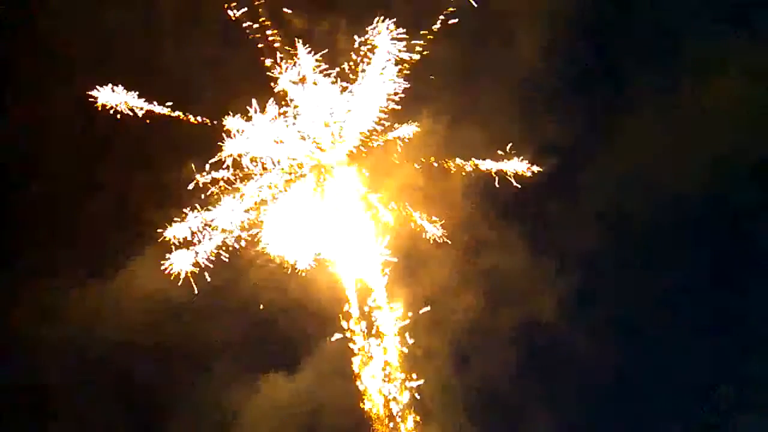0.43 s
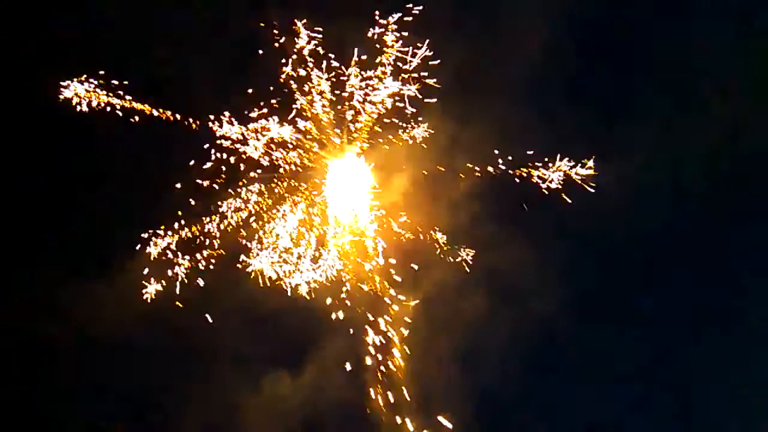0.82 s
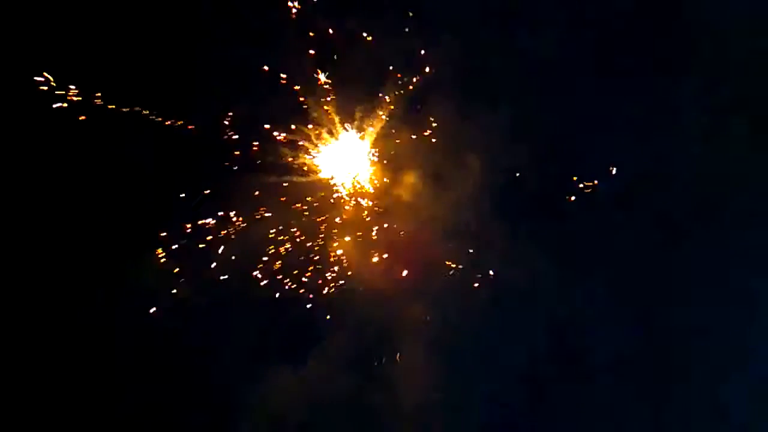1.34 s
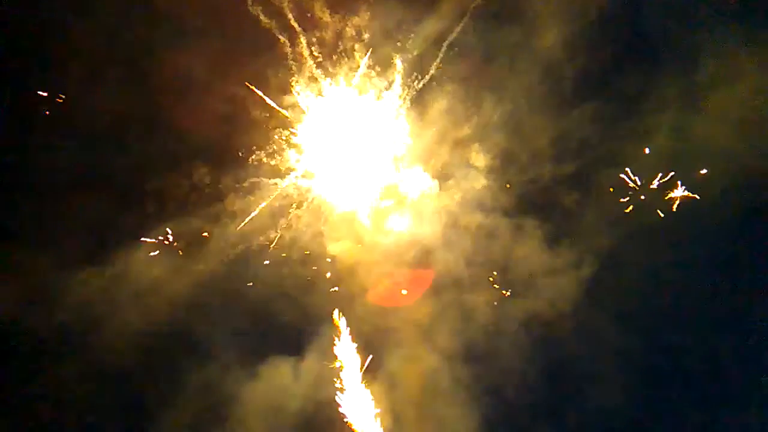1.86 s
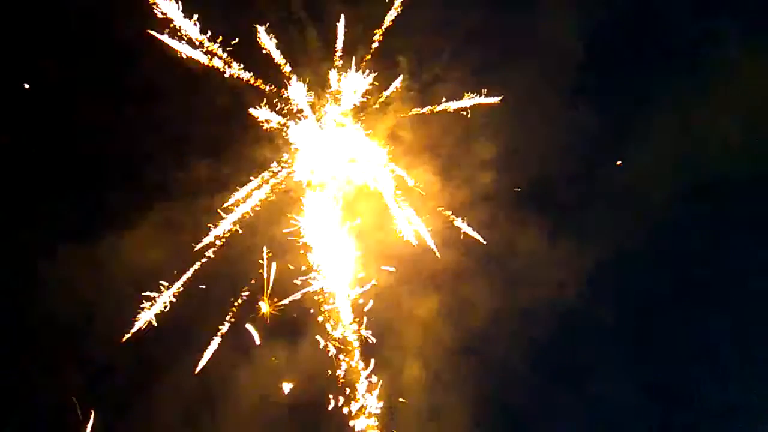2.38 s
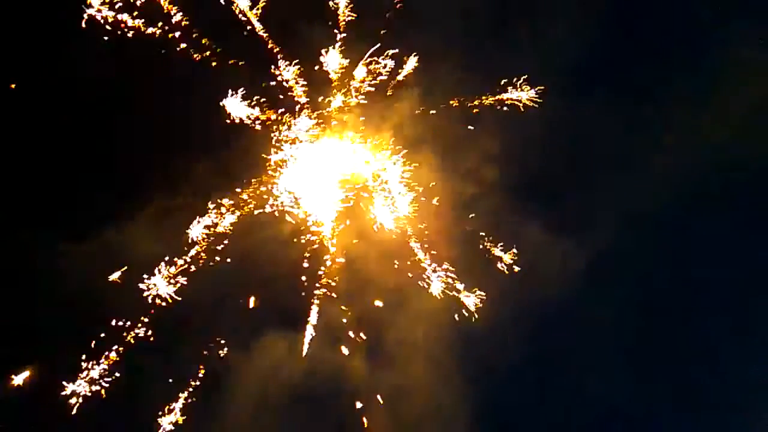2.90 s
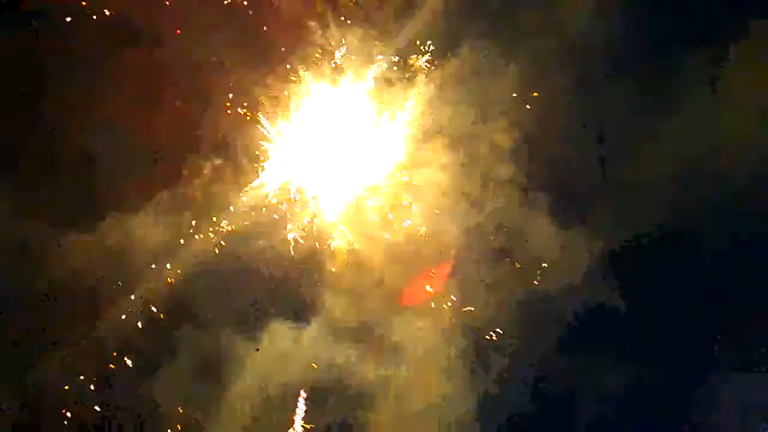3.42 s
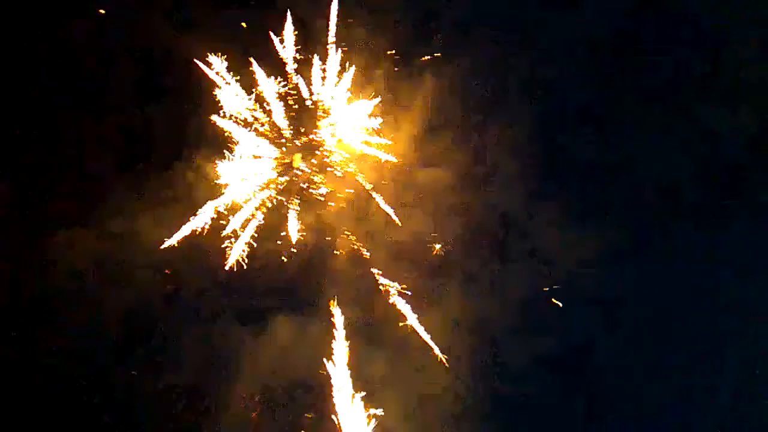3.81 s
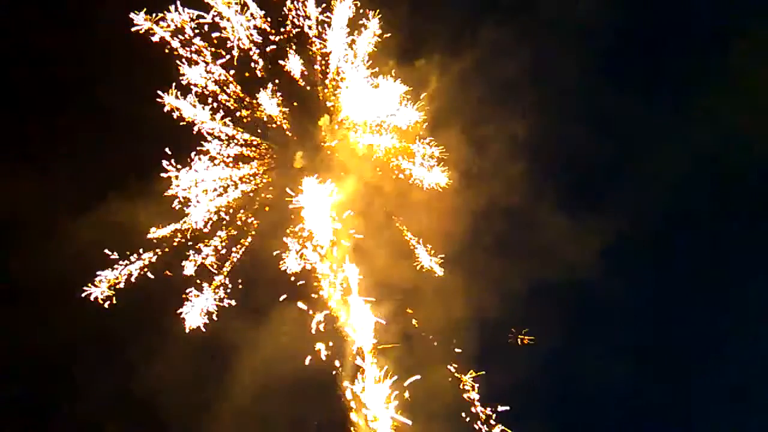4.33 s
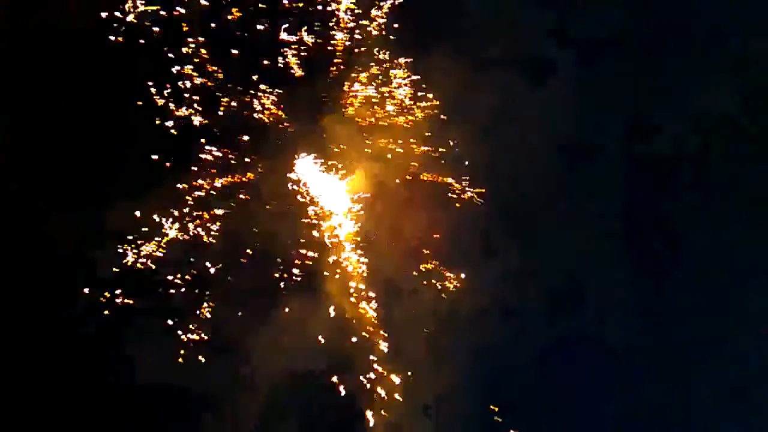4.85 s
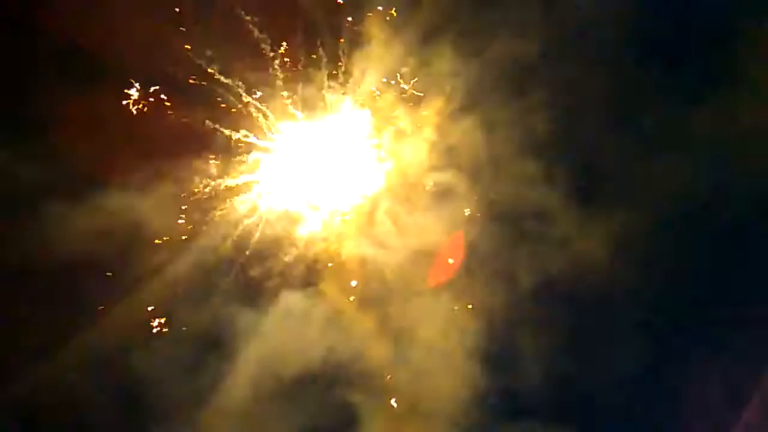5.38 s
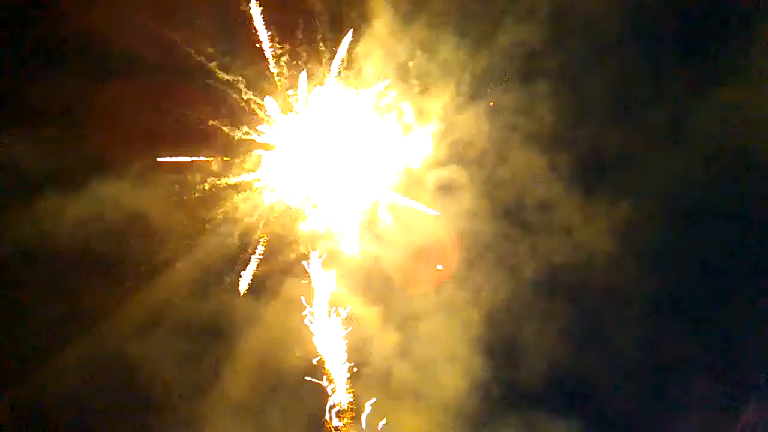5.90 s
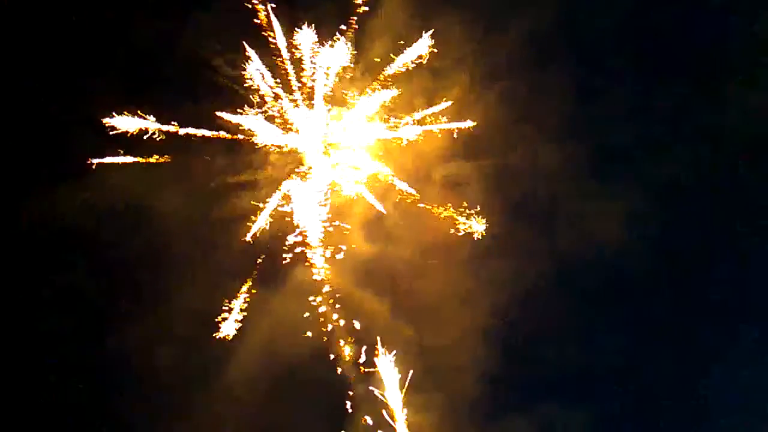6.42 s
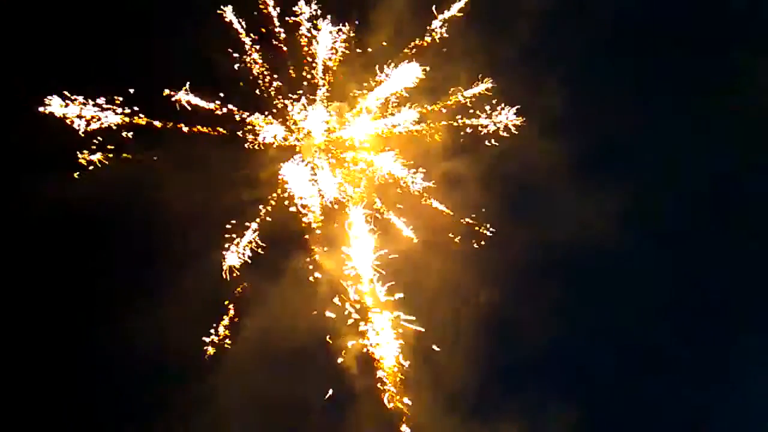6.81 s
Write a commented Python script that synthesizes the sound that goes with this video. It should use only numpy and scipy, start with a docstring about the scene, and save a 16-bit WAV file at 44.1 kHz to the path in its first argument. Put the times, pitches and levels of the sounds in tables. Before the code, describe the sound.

Outdoors at night, a firework battery fires close to a small, easily overloaded microphone. Two blunt, spitting launch bangs hit at about 0.0 and 0.2 s, with rough echoes and a low far rumble. Dense, bright crackling swells around 0.45 s, then thins into single snaps from 1.0 to 1.3 s and near quiet. A second volley starts with a launch at 1.7 s, then tight double-cracking bursts and another launch at 1.95 to 2.1 s; crackle peaks near 2.85 s and fades. At 3.5 to 3.75 s two bursts and a heavy launch slam, another thud follows at 4.1 s, and crackle thickens around 4.4 s, leaving sharp pops from 4.9 to 5.5 s. The last volley bangs at 5.65, 6.15 and 6.35 s, with crackle fullest near 6.8 s, still sputtering at the end. Each bang distorts and briefly ducks the sound; faint air hiss continues.

```python
"""A firework battery at night: tubes spit and push as they launch shells, and the shells burst with double
cracks. Trees, roofs and walls throw each bang back as shaped noise and low thumps, over a long far rumble.
Showers of crackling stars are random clicks sent through short paths; steady noise is the night air. Every bang
overloads a small microphone, which goes deaf for a moment. Above 4 kHz the treble flickers wide in random
patches."""
import sys
import numpy as np
from scipy import signal
from scipy.io import wavfile
from scipy.ndimage import uniform_filter1d

SR = 44100
rng = np.random.default_rng(int(sys.argv[2]) if len(sys.argv) > 2 else 0)


def field_ratio(decibels):
    """Amplitude ratio for a level in dB (20 dB per decade); scalars and array-likes work."""
    return 10 ** (np.asarray(decibels, dtype=float) / 20)


def put_to_file(sound):
    """Save the sound as 16-bit audio at rate SR, in the file named by the first command-line argument."""
    columns = np.atleast_2d(sound).T  # one column per channel
    safe = np.clip(columns, -1, 1)
    whole_steps = np.round(safe * 32767)
    wavfile.write(sys.argv[1], SR, whole_steps.astype(np.int16))


N = 319284  # samples


def evened(x):
    """Normalisation by mean power: scales a signal to rms 1."""
    return x / np.sqrt(np.mean(x ** 2) + 1e-20)


def add(mix, start_s, sound):
    """Linear superposition: mixes a sound in at its start time."""
    part = mix[round(start_s * SR):][:len(sound)]
    part += sound[:len(part)]


def colour(points, size=4096):
    """Minimum-phase filter of energy 1: the Hilbert transform of the log gain gives its causal phase."""
    point_hz, point_db = np.transpose(points)
    hz = abs(np.fft.fftfreq(size, 1 / SR))
    level_db = np.interp(np.log(hz + 1), np.log(point_hz + 1), point_db)
    log_gain = np.log(field_ratio(np.maximum(level_db, -100)))
    taps = np.fft.ifft(np.exp(np.conj(signal.hilbert(log_gain)))).real
    return taps / np.linalg.norm(taps)


def noise(points):
    """Spectral shaping: white noise through a filter of energy 1 keeps an rms of about 1."""
    return signal.oaconvolve(rng.standard_normal(N), colour(points))[:N]


def humps(t, rows):
    """Energy summation of Gaussian humps, 6 dB down one swell time before and one fall time after the top."""
    power = 0
    for top_s, level_db, swell_s, fall_s in rows:
        width_s = np.where(t < top_s, swell_s, fall_s)
        power = power + field_ratio(2 * level_db - 12 * ((t - top_s) / width_s) ** 2)
    return power


def night_air():
    """Stationary background: coloured Gaussian noise at a constant level."""
    # relative spectral density of the background: hz, level_db (per Hz)
    night_colour = [(18, -65), (30, 11), (557, -18), (1740, -10), (2370, -24), (3150, -1.5), (5020, -5.5),
                    (6020, 0.5), (14500, -26)]
    return field_ratio(-48) * noise(night_colour)


def star_clicks():
    """Inhomogeneous Poisson-like process: pops grow denser as the crackle grows louder."""
    # showers of crackling stars, one after each volley: thickest_s, level_db, swell_s, fall_s
    showers = [(0.449, -15.5, 0.36, .44), (2.85, -19, .36, .38), (4.4, -18, .34, 0.39),
               (6.802, -21, .47, 0.44)]
    stragglers_db = -48.5  # late stars between showers
    level_db = 10 * np.log10(humps(np.arange(N) / SR, showers) + field_ratio(2 * stragglers_db))
    per_s = 2800 * field_ratio(1.05 * (level_db + 20))
    clumps = field_ratio(2.2 * evened(uniform_filter1d(rng.standard_normal(N), 500)))
    sizes = field_ratio(3.15 * np.minimum(rng.exponential(1, N), 3.5))
    clicks = sizes * (rng.random(N) < per_s * clumps / SR)
    # divide by the expected rms so that density does not set the level
    return clicks * field_ratio(level_db) / np.sqrt(per_s / SR * np.mean(sizes ** 2) * np.mean(clumps))


def stars(count=24):
    """Impulse-response convolution: each place in the sky has its own snap, ground echo and tail."""
    # relative spectral density of the crackle: hz, level_db (per Hz)
    star_colour = [(200, -24), (500, -14), (900, -11.5), (1700, -6.5), (2400, -13.5), (3300, -3.5),
                   (4000, -7), (5400, -3), (6200, 0), (6700, -6.5), (7200, -16), (8500, -20.5),
                   (9300, -28.5), (12600, -36.5), (14500, -50)]
    # single pops that stand out: start_s, peak_db, ring_hz
    pops = [(1.016, -13, 4470), (1.057, -17, 4550), (1.073, -10, 4870), (1.152, -19, 6200),
            (1.174, -12.5, 3310), (1.193, -11, 5350), (1.224, -14.5, 5310), (1.257, -18, 6450),
            (1.517, -23, 5610), (1.6, -28, 6460), (1.642, -39, 6140), (1.669, -18.5, 4900),
            (1.916, -20.5, 5130), (3.504, -27, 5740), (4.869, -10.5, 6260), (5.014, -13, 5360),
            (5.03, -22, 5590), (5.062, -11.5, 5500), (5.094, -17, 5390), (5.129, -27, 5340),
            (5.253, -17.5, 3330), (5.415, -30, 6260), (5.452, -27, 6270), (5.459, -26, 6140),
            (5.472, -29, 6180), (5.491, -36, 5710), (5.511, -33, 6000), (5.523, -19.5, 6000),
            (5.591, -23, 5960), (5.966, -15, 2690), (6.081, -16, 3250)]
    clicks, place = star_clicks(), rng.integers(0, count, N)
    t = np.arange(round(.15 * SR)) / SR
    snaps = rng.standard_normal((count, len(t))) * field_ratio(-20000 * t)
    tails = rng.standard_normal((count, len(t))) * field_ratio(-24.0 - 1100 * t)
    ground_delays = np.round(rng.uniform(.005, .011, count) * SR).astype(int)
    crackle, edges = np.zeros((2, N))
    for k in range(count):
        path = snaps[k] + field_ratio(-4) * np.roll(snaps[k], ground_delays[k]) + tails[k]
        crackle += signal.oaconvolve(clicks * (place == k), path / np.linalg.norm(path))[:N]
    body = colour(star_colour)
    for k, (start_s, peak_db, ring_hz) in enumerate(pops):
        snap = .2 * np.cos(2 * np.pi * ring_hz * t) * field_ratio(-12000 * t)
        snap[0] = 1
        snap *= field_ratio(peak_db) / abs(np.convolve(snap[:200], body[:200])).max()  # peak after the filter
        ground_echo = field_ratio(-8) * np.roll(snap, round(.007 * SR))
        add(crackle, start_s, snap + ground_echo + 1.3 * snap[0] * tails[k % count])
        add(edges, start_s, field_ratio(peak_db - 9) * np.array([1, -1]))  # a sharp, bright edge
    return signal.oaconvolve(crackle, body)[:N] + edges


def thump(hz=260, decay_s=0.0017):
    """Damped oscillation: a wall returns the bang as a cycle or two of low pressure."""
    t = np.arange(round(.02 * SR)) / SR
    return np.sin(2 * np.pi * hz * t) * np.exp(-t / decay_s) * 2


def booms(count=8, per_s=170):
    """Shot noise of rms 1: a steady hail of low thumps of differing pitch, as from single reflectors."""
    hits = rng.standard_normal(N) * (rng.random(N) < per_s / SR)
    kind = rng.integers(0, count, N)
    hail = np.zeros(N)
    for k, hz in enumerate(np.geomspace(230, 620, count)):
        hail += signal.oaconvolve(hits * (kind == k), np.sqrt(hz) * thump(hz, 1.4 / hz))[:N]
    return evened(hail)


def echoes(start_s, fade, place, bus):
    """Scattering and reflection: adds a bang's echo power, its feed to the far rumble and its wall returns."""
    # groups of trees and roofs that scatter a bang, by its place: delay_s, level_db, swell_s, fall_s
    scatterers = {"near": [(.018, -5.5, 0.0072, 0.014), (.052, -11, .005, 0.022),
                  (.092, -14.5, 0.045, 0.043), (.16, -32, .03, .075)], "side": [(.033, 2.5, .009, 0.0079),
                  (.058, -14.5, 0.0033, .03), (.09, -8, 0.0093, 0.025), (.18, -23.5, 0.099, 0.12)],
                  "sky": [(.0011, -8.5, 0.00082, 0.0032), (.016, -6, 0.0051, .017),
                  (.042, -12, 0.013, 0.033), (.08, -14, .021, .025), (.12, -22, .04, 0.13)]}
    # single walls that return the thump, by the place of the bang: delay_s, level_db
    walls = {"near": [(.018, -23), (.0476, -4), (.0532, -10.5), (.12, -15)], "side": [(.026, -22),
             (.056, -13)], "sky": [(.03, -11.5), (.055, -7.5), (.068, -19), (.088, -13.5)]}
    # how strongly a bang feeds the far rumble, by its place: level_db
    roll_feed = {"near": -5.2, "side": -.1, "sky": 4.7}
    t = np.arange(round(.35 * SR)) / SR
    power = humps(t, scatterers[place]) * field_ratio(-2 * fade * t)  # fade in dB/s
    darkening = 22.4  # extra fade of the bright echo, dB/s
    add(bus["bright"], start_s, power * field_ratio(-2 * darkening * t))
    add(bus["low"], start_s, power)
    add(bus["far"], start_s + 0.017, field_ratio([2 * (roll_feed[place] - 0.4 * fade)]))
    for delay_s, level_db in walls[place]:
        add(bus["pressure"], start_s + delay_s, field_ratio(level_db) * thump())


def far_roll(feed):
    """Exponential reverberant decay: each bang's energy dies away as a far rumble."""
    # relative spectral density of the rumble: hz, level_db (per Hz)
    roll_colour = [(40, 1), (65, -3.5), (150, -3.5), (400, 0), (1200, -6), (3000, -11.5), (7000, -38),
                   (14000, -37)]
    level_db, t60_s = -29, 2.81
    step = field_ratio(-120 / t60_s / SR)  # power kept from one sample to the next
    return field_ratio(level_db) * np.sqrt(signal.lfilter([1], [1, -step], feed)) * noise(roll_colour)


def echo_field(bus):
    """Energy envelopes on noise: lumpy bright scatter, a low hail of thumps and the far roll."""
    # relative spectral density of the bright scatter: hz, level_db (per Hz)
    echo_colour = [(40, -28), (100, 1.5), (600, -5), (900, -6.5), (1800, -0.5), (2500, -3), (3400, -0.5),
                   (5200, -3), (6000, -10.5), (8400, -21.5), (12200, -35), (14500, -44)]
    lumps = field_ratio(1.86 * evened(uniform_filter1d(rng.standard_normal(N), 120)))  # separate reflectors
    bright = np.sqrt(bus["bright"]) * evened(lumps) * noise(echo_colour)
    low = field_ratio(-11.5) * np.sqrt(bus["low"]) * booms()
    return bright + low + far_roll(bus["far"])


def push(level_db, hold_s, rise_s=0.0015):
    """Blast wave: overpressure jumps up, holds and drains into a shallow suction."""
    t = np.arange(round(.06 * SR)) / SR
    u = t / hold_s
    return field_ratio(level_db) * np.minimum(t / rise_s, 1) * (1 - u ** 2) * np.exp(-1.2 * u ** 1.29)


def launches(bus):
    """Muzzle blast: each tube spits turbulent noise for a few ms, then pushes."""
    # launches; hold is the time before the push reverses, while the microphone is deaf:
    # start_s, spit_db, push_db, hold_s, extra_echo_fade_db_per_s, place
    rows = [(0.0354, 8, 8, .0052, -25, "near"), (0.1935, -3.5, 20, .012, 7, "side"),
            (1.7186, 3.5, 13, 0.0083, 11, "near"), (2.1098, -6, 6.5, 0.023, -29, "near"),
            (3.7374, 0.5, 21.5, 0.0093, 16, "side"), (4.1117, -1, 5, 0.0032, -3.5, "near"),
            (5.6431, 6, 10, 0.016, 20, "near"), (6.3307, -1, 11.5, 0.011, 6, "near")]
    # relative spectral density of the spit: hz, level_db (per Hz)
    spit_colour = [(100, 12.5), (600, 0), (3000, 3.5), (6000, -10.5), (9000, -11.5), (14000, -16)]
    spit, t = np.zeros(N), np.arange(round(.0098 * SR)) / SR
    for start_s, spit_db, push_db, hold_s, fade, place in rows:
        add(spit, start_s - .001, field_ratio(spit_db) * np.minimum(t / 0.004, 1) ** 2)
        add(bus["pressure"], start_s + .0072, -push(push_db, hold_s))
        echoes(start_s, fade, place, bus)
    return spit * noise(spit_colour)


def bursts(bus):
    """Blast wave with ground reflection: each shell cracks twice, direct and off the ground."""
    # shell bursts; hold is the time before the direct push reverses, while the microphone is deaf:
    # start_s, crack_db, push_db, hold_s, extra_echo_fade_db_per_s
    rows = [(1.9569, -4.5, 7.5, 0.0028, 16), (2.0957, -3, 8.5, 0.002, 9), (3.534, 1.2, 1.5, 0.0038, -6),
            (3.6810, -0.5, 8.5, .0017, -7), (5.6854, -9, 0.5, 0.036, 0.5), (6.1686, .1, 4.5, 0.003, -2.5)]
    # relative spectral density of the crack: hz, level_db (per Hz)
    crack_colour = [(500, 12), (3000, -10), (8500, 7), (12000, -3.5), (14500, -4.5)]
    crack, t = np.zeros(N), np.arange(400) / SR
    for start_s, crack_db, push_db, direct_hold_s, fade in rows:
        for delay_s, gain_db, hold_s in ((0, 0, direct_hold_s), (.0118, -1, .002)):
            arrival_s = start_s + delay_s
            add(bus["pressure"], arrival_s, -push(8 + gain_db, .0008, rise_s=.0003))
            add(bus["pressure"], arrival_s + 0.00039, push(push_db + gain_db, hold_s))
            # the ground dulls the crack by 14 dB
            add(crack, arrival_s, field_ratio(crack_db + 14.0 * gain_db - 5000 * t))
        echoes(start_s, fade, "sky", bus)
    return crack * noise(crack_colour)


def bangs():
    """Superposition of direct and returned waves: launches, bursts, their pressure and their echoes."""
    bus = {name: np.zeros(N) for name in ("pressure", "bright", "low", "far")}
    direct = launches(bus) + bursts(bus)
    return bus["pressure"] + direct + echo_field(bus)


def scene():
    """Coincident arrival: all sources come from one direction, alike in both channels."""
    return np.tile(night_air() + stars() + bangs(), (2, 1))


def gain_control(x, knee_db=0, share=.5, release_db_per_s=220):
    """Dynamic compression: gain drops by a share of the overload, whose held peak falls at a steady rate."""
    power_db = 10 * np.log10(signal.lfilter([.003], [1, -.997], x ** 2) + 1e-12)
    fall_db = np.arange(N) * release_db_per_s / SR
    held_db = np.maximum.accumulate(power_db + fall_db) - fall_db
    over_db = np.maximum(held_db - knee_db, 0)
    return field_ratio(-share * signal.lfilter([.002], [1, -.998], over_db))


def wide_patches(mid):
    """Interchannel decorrelation: in random patches of pitch and time the treble flickers wide."""
    # share of treble patches that go wide: hz, share (0 to 1)
    wide_share = [(4150, .18), (5100, .33), (6800, .36), (8300, 0.505), (12000, .55)]
    centred = 0.3  # level above which fronts stay centred
    patch_hz, patch_s, side_db = 1367, .05, -2
    soft = centred * np.tanh(mid / centred)
    hz, t, spectrum = signal.stft(soft, SR, nperseg=1024)
    turn = np.exp(2j * np.pi * rng.random(spectrum.shape))
    draw, stagger = rng.random((400, 64)), rng.random(64)
    band = np.minimum(hz / patch_hz, 63).astype(int)
    block = np.minimum(t / patch_s + stagger[band, None], 399).astype(int)
    share = np.interp(hz, *np.transpose(wide_share), left=0)
    wide = draw[block, band[:, None]] < share[:, None]
    side = signal.istft(spectrum * turn * wide, SR, nperseg=1024)[1][:N]
    # nothing spreads ahead of a bang
    now, around = (abs(uniform_filter1d(soft ** 2, size)) + 1e-12 for size in (200, 1500))
    begun = uniform_filter1d(np.minimum(3 * now / around, 1), 100)
    return field_ratio(side_db) * side * begun


def top_cut(x):
    """Nothing passes above the cut-off."""
    return signal.sosfilt(signal.butter(12, 15560, fs=SR, output="sos"), x)


def record(dry):
    """Nonlinear transduction: capsule saturates, bass cut swings back, gain ducks, port rings, converter clips."""
    mid = np.tanh(dry[0])
    bass_cut = signal.butter(3, 63.4, "high", fs=SR, output="sos")
    mid = signal.sosfilt(bass_cut, mid)
    mid = mid * gain_control(dry[0])
    mid = mid + .3 * signal.lfilter(*signal.iirpeak(3900, 40, SR), mid)  # port resonance
    side = wide_patches(mid)
    both = np.array([mid + side, mid - side])
    treble_cut = signal.firwin(255, 14300, window=("kaiser", 8), fs=SR)
    both = signal.oaconvolve(both, treble_cut[None], "same")
    return top_cut(np.clip(both, -1, 1))


dry = scene()
out = record(dry)
put_to_file(out)
```